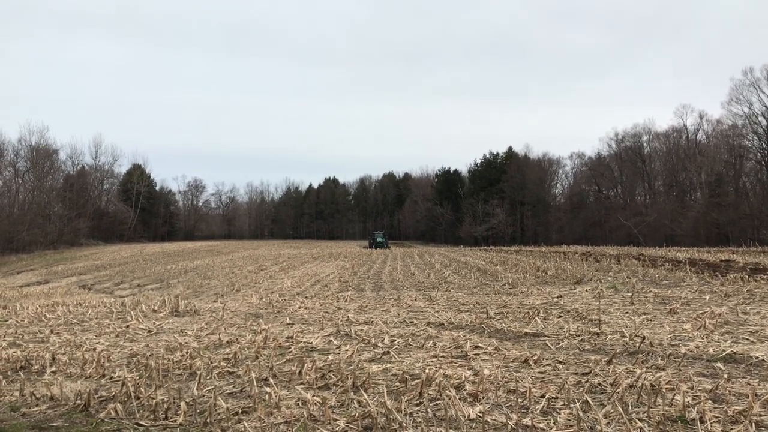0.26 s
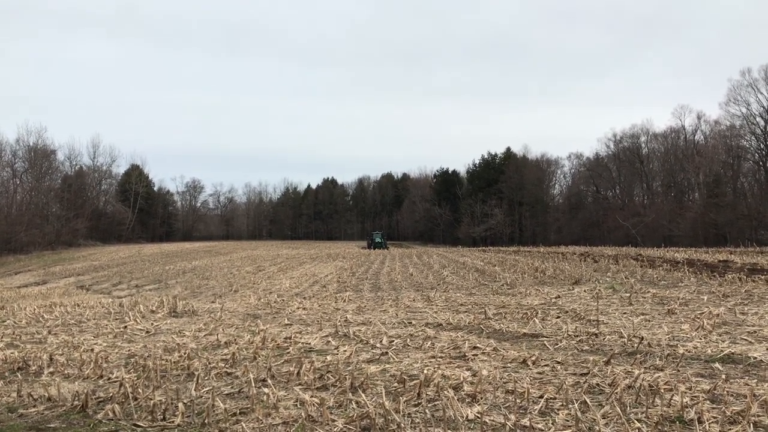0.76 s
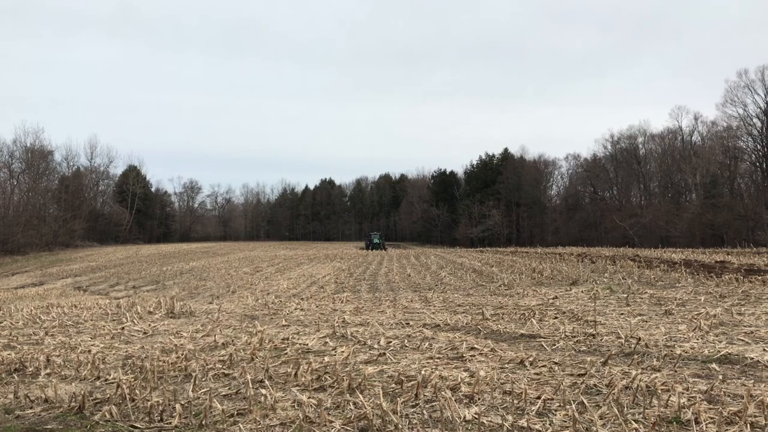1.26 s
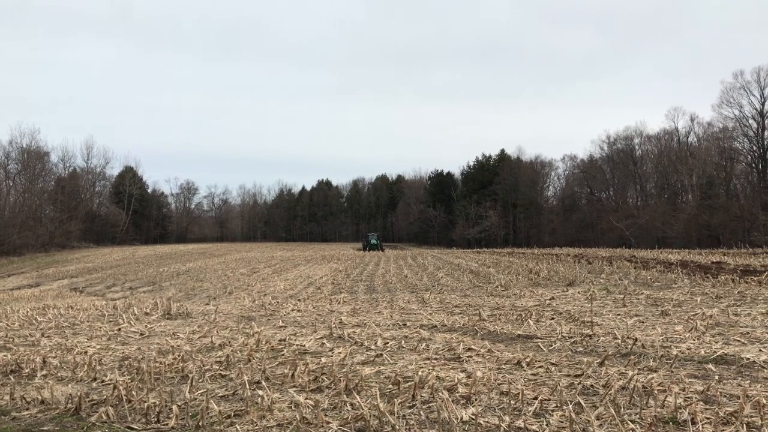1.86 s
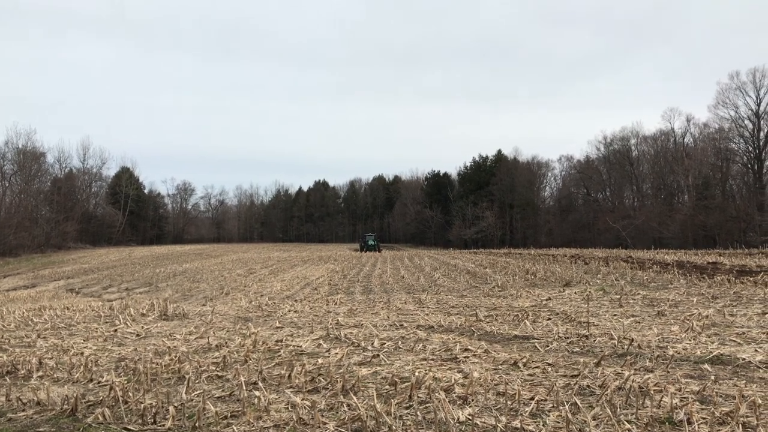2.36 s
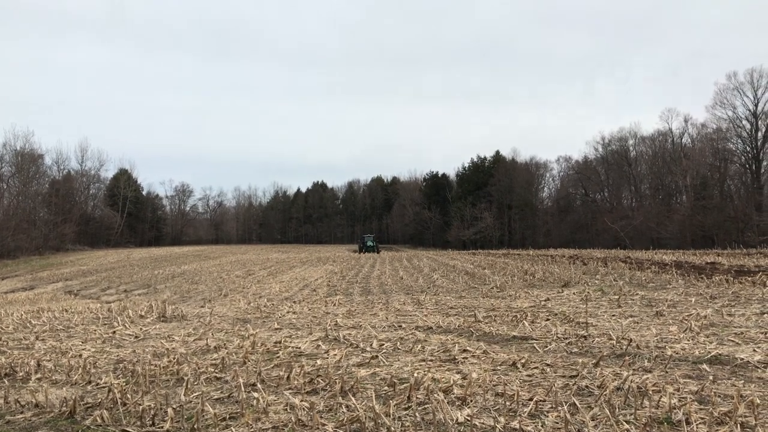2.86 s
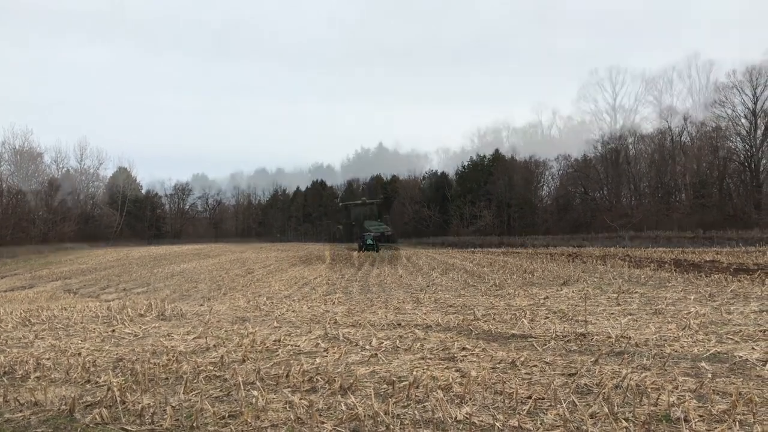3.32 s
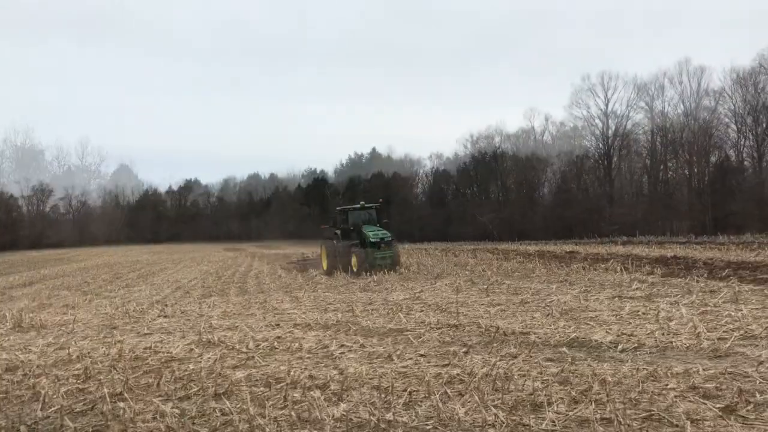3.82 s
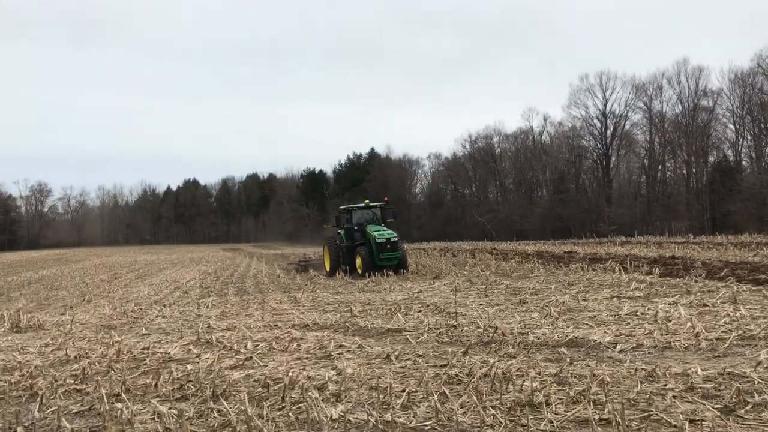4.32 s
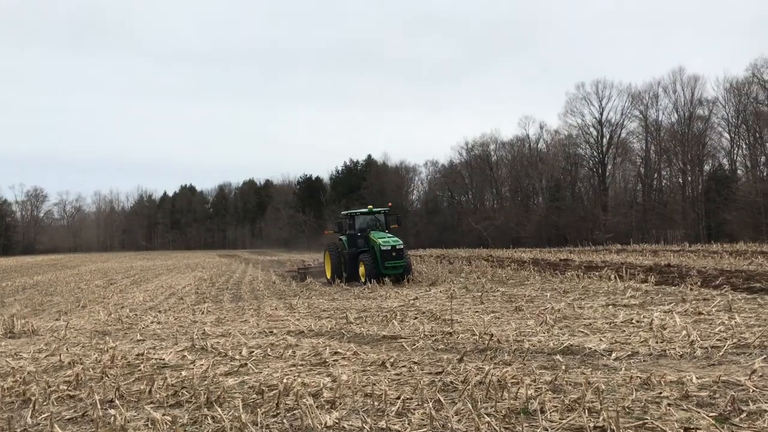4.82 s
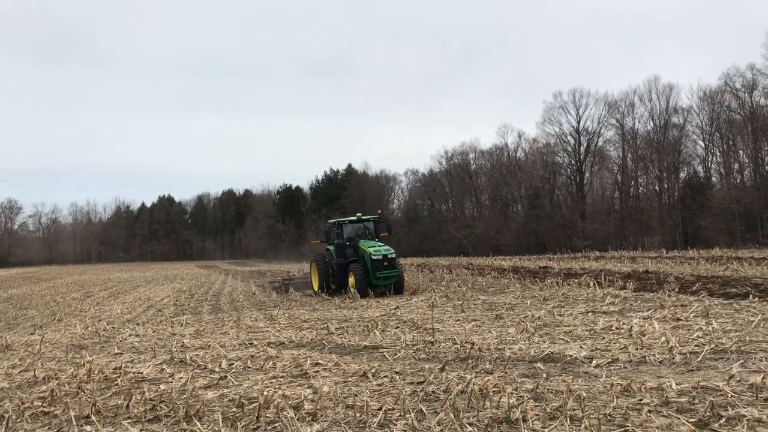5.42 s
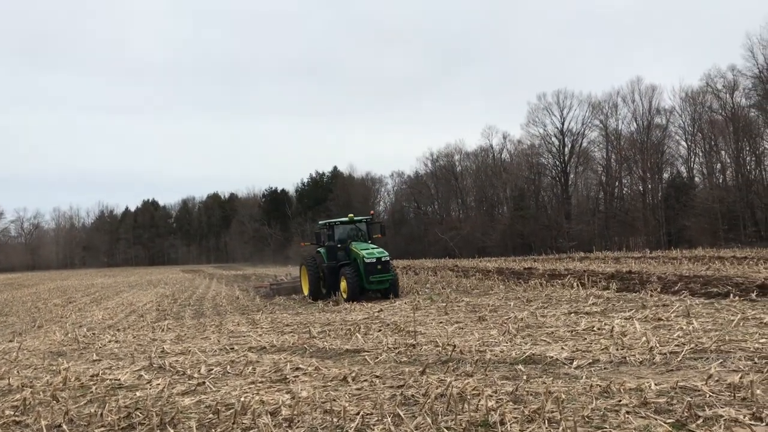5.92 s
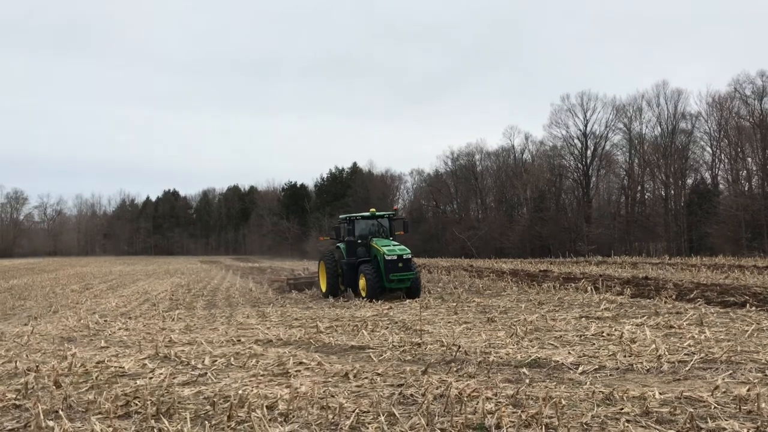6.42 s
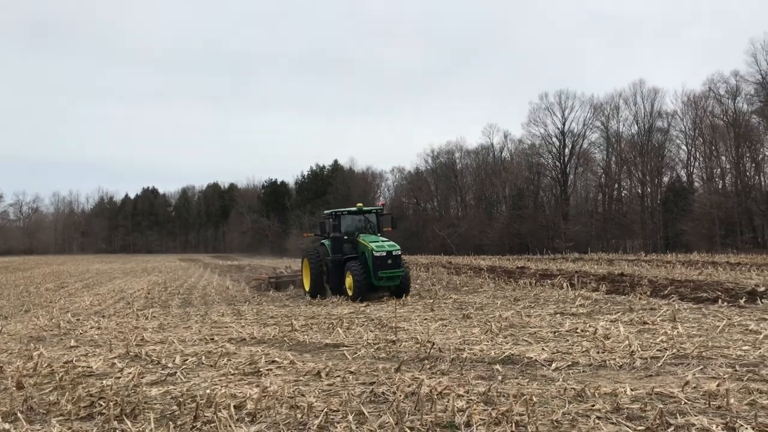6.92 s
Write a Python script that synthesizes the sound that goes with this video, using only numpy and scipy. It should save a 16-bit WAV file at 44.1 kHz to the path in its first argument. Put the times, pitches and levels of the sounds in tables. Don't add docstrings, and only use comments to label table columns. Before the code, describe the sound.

A distant plough tractor drones quietly at nearly constant pitch, with light wind bumping the microphone. The sound then blends smoothly into a nearer position, where a strong, slightly higher hum, throbbing exhaust and mechanical clatter dominate and slowly grow. Soil and straw hiss beneath, while brittle stalks crack sharply in the foreground, scattered through the middle and clustered just before the end.

```python
import sys
import numpy as np
from scipy import signal
from scipy.fft import rfft, irfft
from scipy.io import wavfile

SR = 44100
rng = np.random.default_rng(int(sys.argv[2]) if len(sys.argv) > 2 else 0)


def ratio(d):
    e = np.asarray(d, float) / 20
    return 10 ** e


def transcribe(u):
    v = np.clip(np.atleast_2d(u).T, -1, 1)
    q = np.round(v * 32767).astype(np.int16)
    wavfile.write(sys.argv[1], SR, q)


N = 316638
TIME_S = np.arange(N) / SR

# (start [s], end [s])
DISSOLVE = (2.887, 4.33)
# (frequency [Hz], spectrum level [dB])
HISS_SPECTRUM = [(2710, -4), (4600, -1.5), (4920, -10.5), (5320, -0.5), (6180, -1.5), (7640, -8),
                 (9060, -6), (10400, -13), (12500, -10.5), (15100, -17.5), (15800, -15)]


def in_time(rows):
    s, *columns = np.transpose(rows)
    return [np.interp(TIME_S, s, c) for c in columns]


def rms_one(x):
    return x / np.sqrt(np.mean(x ** 2) + 1e-20)


def drift(rate_hz):
    pole = np.exp(-80 * np.pi * rate_hz / SR)
    noise = rng.standard_normal(N // 40 + 2002)
    slow = signal.lfilter([1], [1, -2 * pole, pole * pole], noise)[2000:]
    return np.interp(np.arange(N) / 40, np.arange(len(slow)), rms_one(slow))


def colour(x, points, lo_hz, hi_hz):
    hz = np.maximum(np.arange(N // 2 + 1) * SR / N, 1)
    point_hz, point_db = np.transpose(points)
    octaves_below = np.maximum(np.log2(point_hz[0] / hz), 0)
    octaves_above = np.maximum(np.log2(hz / point_hz[-1]), 0)
    curve_db = np.interp(np.log(hz), np.log(point_hz), point_db)
    shaped = rfft(x) * ratio(curve_db - 60 * (octaves_below + octaves_above))
    inside = irfft(shaped * (hz > lo_hz) * (hz < hi_hz), N)
    return irfft(shaped, N) / np.std(inside)


def swell(end_db, db_per_s):
    return ratio(end_db + db_per_s * (TIME_S - DISSOLVE[1]))


def turns(hz):
    return 2 * np.pi * np.cumsum(hz) / SR


def tone(phase, wobble_db, jitter):
    level = np.sqrt(2) * ratio(wobble_db * drift(6.1))
    return level * np.sin(phase + jitter * drift(5.4) + rng.uniform(0, 7.62))


def fan(blade_hz, fan_db, overtones):
    phase = turns(blade_hz)
    hum = tone(phase, wobble_db=0.6, jitter=0.08)
    for multiple, db in overtones:
        hum = hum + ratio(db) * tone(multiple * phase, wobble_db=4, jitter=0.34)
    return ratio(fan_db) * hum


def orders(firing, multiples, levels_db):
    return sum(ratio(db) * tone(multiple / 6 * firing, wobble_db=3, jitter=0.25)
               for multiple, db in zip(multiples, levels_db))


def knocking(firing, depth):
    pulse = np.cos(firing) + 0.46 * np.cos(firing / 3) + 0.41 * np.cos(2 * firing / 3)
    return rng.standard_normal(N) * (1 + depth * pulse)


def far_air(fade):
    # (frequency [Hz], spectrum level [dB])
    hush_spectrum = [(4300, -4), (4900, -3), (5800, -1), (7000, -9), (7700, -14.5), (9400, -12),
                     (10500, -17.5), (11300, -13.5), (13000, -11.5), (15900, -14)]
    # (middle [s], half length [s], level [dB])
    gust_events = [
        (0.9, 0.6, -69),
        (2.0, 0.4, -58),
        (3.3, 0.4, -63),
    ]
    hush = ratio(-72.5 + 1.1 * TIME_S) * colour(rng.standard_normal(N), hush_spectrum, 3900, 16600)
    buffeting = colour(rng.standard_normal(N), [(15, -13), (35, 4), (52, 5), (60, -12)], 20, 55)
    strength = sum(ratio(db) * np.exp(-((TIME_S - s) / half) ** 2) for s, half, db in gust_events)
    return fade * (hush + buffeting * strength)


def far_tractor(fade):
    # (time [s], fan blade rate [Hz], fan level [dB])
    far_speed = [(0.0, 157.2, -34.2), (0.55, 157.7, -36.6), (1.2, 157.2, -34.8), (1.65, 155.4, -35.0),
                 (2.1, 156.1, -34.9), (2.5, 154.7, -35.1), (3.0, 156.3, -34.6), (3.8, 159.4, -34.6)]
    # (frequency [Hz], spectrum level [dB])
    far_rumble = [(25, -31), (45, -21), (65, -3.5), (97, -0.5), (125, -2.5), (190, -1), (230, -4),
                  (280, -22.5), (360, -26), (540, -33)]
    # (frequency [Hz], spectrum level [dB])
    far_clatter = [(260, -22), (450, -13), (537, -12), (564, -6.5), (714, -4.5), (780, -2.5), (811, -8.5),
                   (940, -2.5), (1630, -5.5), (2410, -9), (3110, -19.5), (3750, -16.5), (4700, -28),
                   (6110, -56), (10300, -120)]
    far_multiples = [3, 5, 6, 12, 24, 32, 35.7, 39, 47.75, 57.6, 64, 71, 96]
    far_order_db = [-66, -58, -53, -58, -77, -75, -64, -67, -61.5, -62.5, -72, -66.5, -70]
    # (frequency [Hz], width [Hz], level [dB])
    turbo_whistle = (14130, 240, -82)

    blade_hz, fan_db = in_time(far_speed)
    firing = turns(blade_hz / 1.622)
    hum = fan(blade_hz, fan_db, [(2, -40), (3, -40)])
    rumble = swell(-47, 0.01) * colour(knocking(firing, depth=0.087), far_rumble, 60, 136)
    clatter = swell(-45, 0.87) * colour(knocking(firing, depth=0.045), far_clatter, 500, 2600)

    whistle_hz, width_hz, whistle_db = turbo_whistle
    sweep = turns(whistle_hz * (1 + 0.005 * drift(2.5)))
    lowpass = signal.butter(2, width_hz / 2, fs=SR, output="sos")
    smear = signal.sosfilt(lowpass, rng.standard_normal(N))
    whistle = ratio(whistle_db) * rms_one(smear) * np.sin(sweep)
    return fade * (hum + rumble + clatter + whistle + orders(firing, far_multiples, far_order_db))


def stubble(fade):
    rustle = rng.standard_normal(N) * ratio(0.7 * drift(25))
    return fade * swell(-42.5, 0.034) * colour(rustle, HISS_SPECTRUM, 4100, 17000)


def crackle(per_s, lift_db):
    sizes = ratio(3 * np.minimum(rng.exponential(1, N), 3)) * rng.choice([-1, 1], N)
    breaks = (rng.random(N) < per_s / SR) * sizes
    brighter = [(hz, db + lift_db * np.log2(hz / 5000)) for hz, db in HISS_SPECTRUM]
    return colour(breaks, brighter, 5000, 12000)


def stalks():
    # (start [s], length [s], crackle level [dB])
    crunch_events = [(3.122, 0.052, -61), (3.243, 0.12, -64), (3.433, .07, -56), (3.513, 0.031, -48.5),
                     (3.562, 0.058, -45.5), (3.733, 0.14, -49.5), (3.89, 0.087, -46.5),
                     (4.08, 0.027, -45.5), (4.133, 0.14, -45), (4.33, .04, -45.5), (4.427, 0.025, -43),
                     (6.467, 0.046, -47), (6.595, 0.099, -48.5), (6.785, 0.03, -40), (6.847, 0.12, -41)]
    # (time [s], peak level [dB], length [ms])
    snap_events = [(2.954, -49, 1.3), (3.2371, -43, 1.3), (3.2515, -37.5, 1.3), (3.518, -28, 1.7),
                   (3.575, -28, 1), (3.7252, -28.5, 1.3), (3.744, -26.5, 1.4), (3.7768, -30, 1.8),
                   (3.9613, -29, 2.5), (4.088, -30, 1), (3.9175, -31, 1.2), (4.3431, -31, 1.3),
                   (4.54, -27, 1.2), (4.645, -28, 1.4), (5.058, -25.5, 0.86), (5.322, -30, 2),
                   (5.6194, -32, 1.5), (6.121, -33, 1.3), (6.2163, -31, 1.3), (6.484, -29, 2.2),
                   (6.5836, -25, 1.6), (6.6397, -25, 1.5), (6.7865, -28, 2.2), (6.794, -23, 2.3),
                   (6.8148, -26, 1.0), (6.8178, -16, 1.8), (6.8694, -41, 1.5), (6.8994, -27, 1.5),
                   (6.9144, -32, 1.5)]
    spells = 0
    for start, length, db in crunch_events:
        progress = np.clip((TIME_S - start) / length, 0, 1)
        spells = spells + ratio(db) * np.sin(np.pi * progress) ** 0.49

    snaps = np.zeros(N + 400)
    since_ms = np.arange(400) / SR * 1000
    for s, db, ms in snap_events:
        i = round(s * SR)
        snaps[i:i + 400] += ratio(db - 8.0) * since_ms / ms * np.exp(1 - (since_ms / ms) ** 2)
    return spells * crackle(1800, lift_db=2.0) + snaps[:N] * crackle(8000, lift_db=2.5)


def near_tractor(fade):
    # (time [s], firing rate [Hz])
    near_speed = [(3.1, 107.0), (3.38, 108.1), (3.7, 106.3), (4.02, 108.8), (4.3, 107.4), (4.58, 108.5),
                  (4.88, 107.4), (5.46, 108.6), (5.78, 108.4), (6.42, 108.5), (7.18, 107.5)]
    # (frequency [Hz], spectrum level [dB])
    near_rumble = [(25, -40), (45, -13), (62, -13.5), (100, 2.5), (150, -1), (200, 0.5), (250, 1.5),
                   (290, -12.5), (400, -21.5), (480, -13.5)]
    # (frequency [Hz], spectrum level [dB])
    near_clatter = [(250, -29), (420, -9.5), (472, -10), (524, -5.5), (607, -4), (654, -2), (773, -11.5),
                    (859, -4.5), (1060, -1.5), (1350, -5.5), (1930, -9), (2290, -5.5), (2740, -14.5),
                    (3750, -13.5), (5200, -24), (6760, -83), (11400, -120)]
    # (multiple of the blade rate, level under the blade tone [dB])
    near_overtones = [(2, -27), (3, -25), (5, -29)]
    near_multiples = [3, 5, 6, 9, 18, 20, 24, 30, 32, 39, 40, 51, 56, 57.7, 60, 68, 71, 79, 80.8, 99, 102,
                      113, 123, 125.6, 134, 165, 182, 196, 203, 214.6]
    near_order_db = [-50, -45, -45, -47, -51, -49, -49, -52, -52, -52, -52, -52, -51, -46, -44, -50, -46.5,
                     -50, -49.5, -50, -53, -55, -52, -50, -55, -59, -56, -59, -59, -58]

    firing_hz, = in_time(near_speed)
    firing = turns(firing_hz)
    blade_hz = 175.1 + 1.0 * (firing_hz - 108.0)
    hum = swell(-23.8, 0.46) * fan(blade_hz, 0, near_overtones)
    sixth = swell(-40.5, 1.06) * tone(6 * firing, wobble_db=1.2, jitter=0.08)
    second = swell(-39, 2.4) * tone(2 * firing, wobble_db=3, jitter=0.3)
    rumble = swell(-35.5, 0.38) * colour(knocking(firing, depth=0.61), near_rumble, 40, 134)
    clatter = swell(-30, 0.43) * colour(knocking(firing, depth=0.025), near_clatter, 620, 3500)
    engine_orders = swell(-1.3, 0.97) * orders(firing, near_multiples, near_order_db)
    return fade * (hum + sixth + second + rumble + clatter + engine_orders)


def scene():
    near = np.interp(TIME_S, DISSOLVE, [0, 1])
    far = 1 - near
    mix = far_air(far) + far_tractor(far) + stubble(near) + stalks() + near_tractor(near)
    return mix[None]


def low_pass(x):
    return signal.sosfilt(signal.butter(12, 15980, fs=SR, output="sos"), x)


def record(dry):
    hz = np.arange(N // 2 + 1) * SR / N
    mix = irfft(rfft(dry) * (hz < 15730), N)
    return low_pass(mix)


dry = scene()
out = record(dry)
transcribe(out)
```